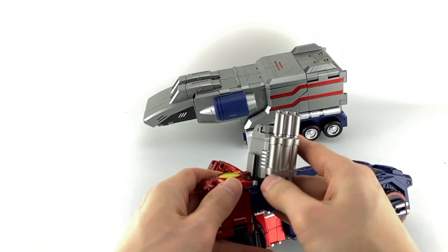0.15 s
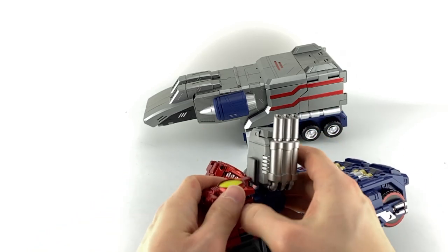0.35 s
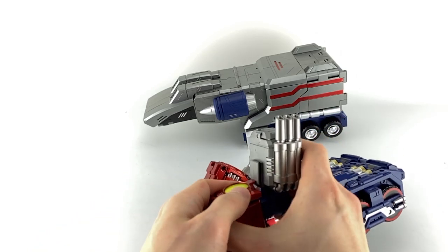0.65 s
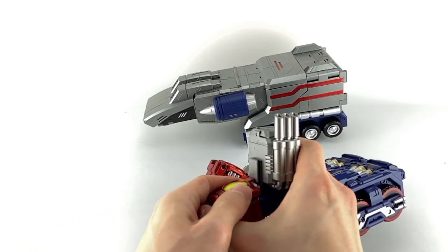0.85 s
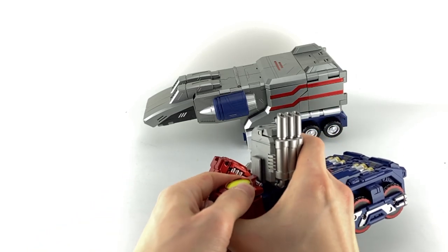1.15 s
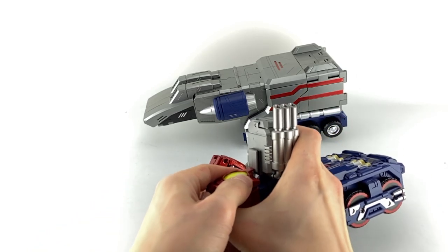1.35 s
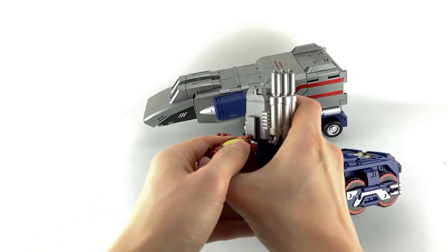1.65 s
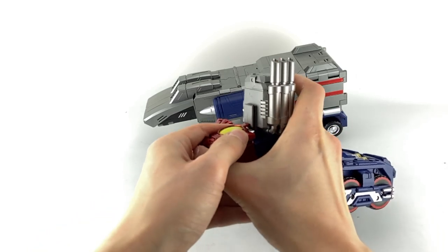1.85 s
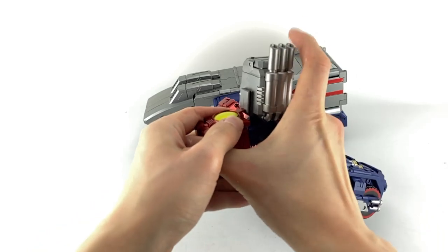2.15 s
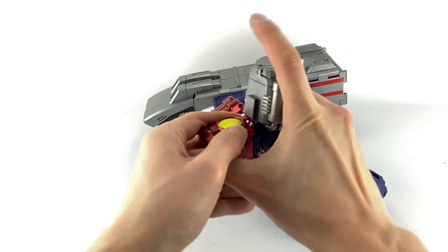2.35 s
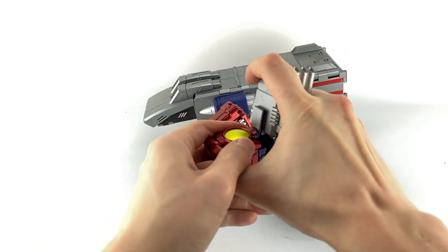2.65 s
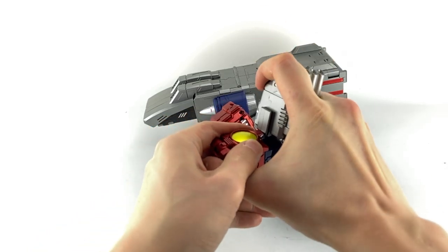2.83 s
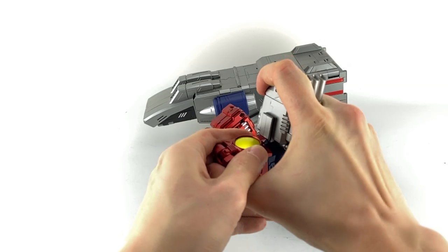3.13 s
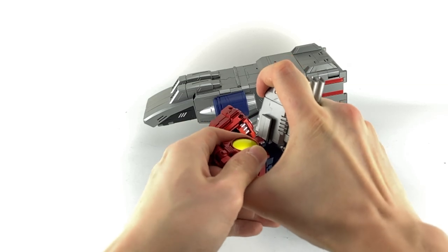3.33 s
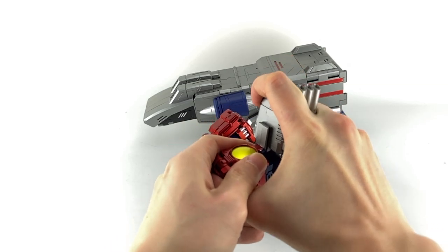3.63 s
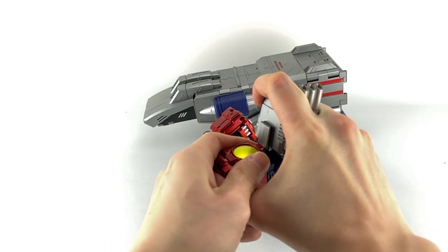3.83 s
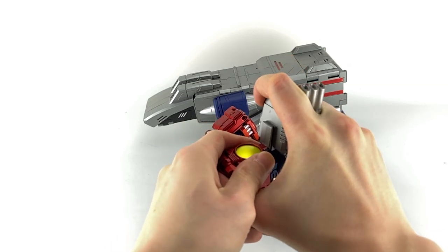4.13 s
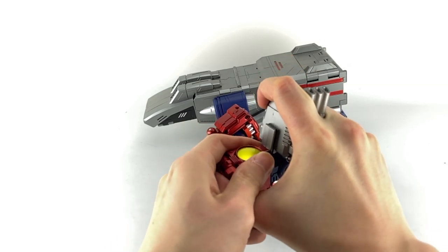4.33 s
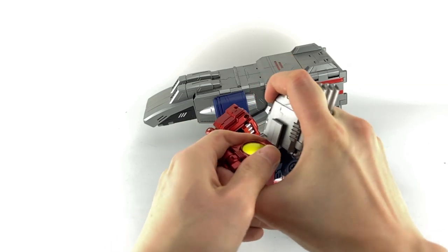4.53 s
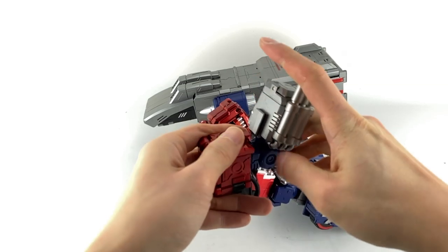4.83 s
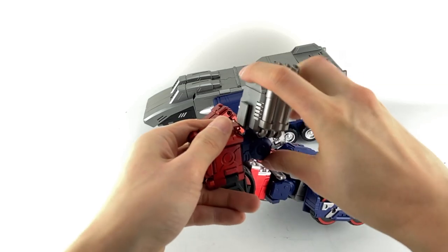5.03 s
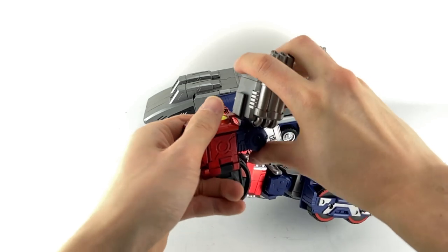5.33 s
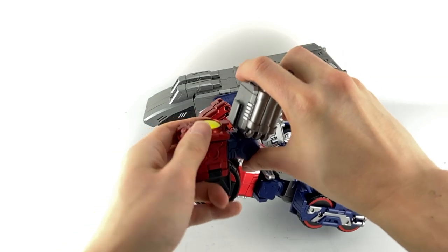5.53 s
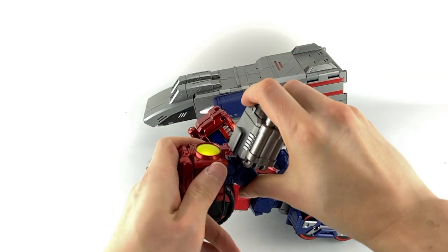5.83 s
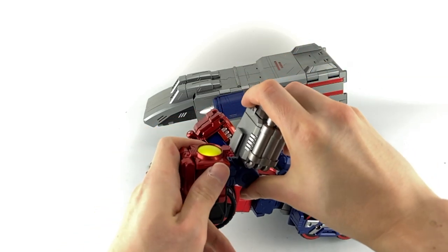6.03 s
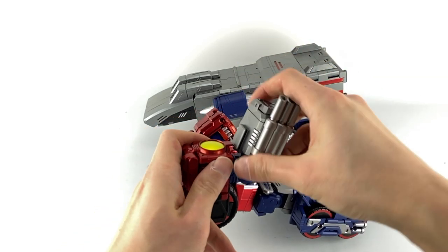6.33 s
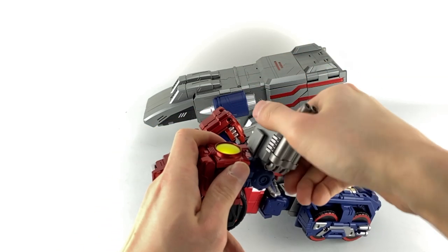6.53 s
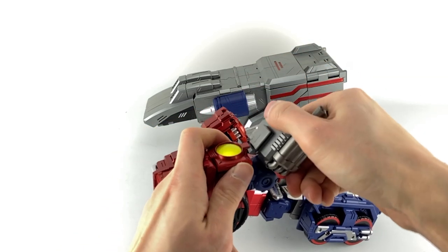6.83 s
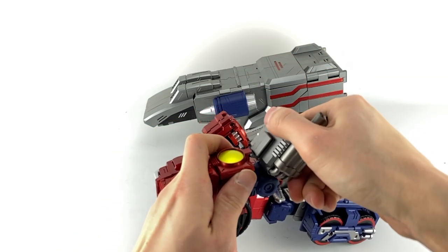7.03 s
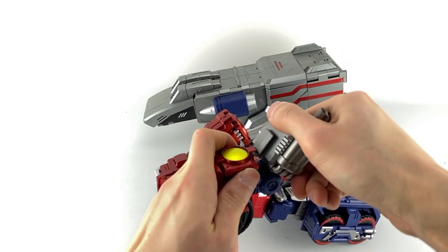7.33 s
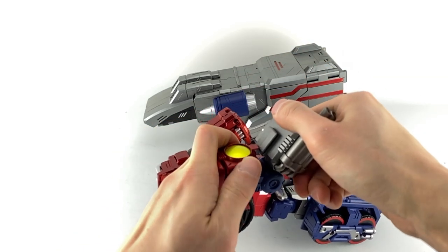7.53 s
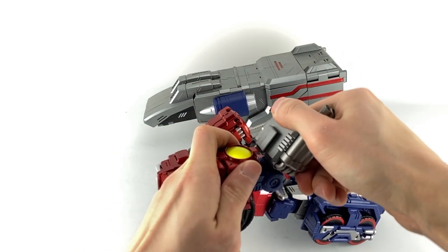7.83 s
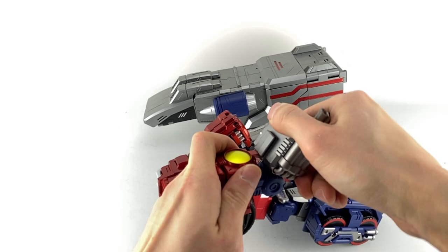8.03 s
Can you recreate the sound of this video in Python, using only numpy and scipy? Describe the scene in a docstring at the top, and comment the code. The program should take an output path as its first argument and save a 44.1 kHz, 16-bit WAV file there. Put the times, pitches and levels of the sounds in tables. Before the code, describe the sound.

A close microphone in a small, still room picks up a hollow plastic toy being handled on a table, over a steady, soft, bass-heavy hush. From 0 to 0.7 s the figure scrapes and rattles with short pitched ticks, dull low bumps and a tight pair of bright snaps around 0.35 s. Slower chattering drags and soft thumps continue, bending slightly in pitch, until a very loud, crisp tab snap at 1.9 s. From 2 to 4.6 s it is much quieter: brief dry finger rubs and small clicks, one clearer at 2.4 s. Scuffing grows from 4.7 s, with a firm clack and table thump at 5.15 s, then lighter rubs and ticks. At 6.5 s parts knock down heavily; a piercing snap at 6.7 s and another booming knock at 6.8 s follow. Rubbing fades, leaving near stillness, then soft scuffs from 7.8 s and a light knock at 8.1 s.

```python
"""Hands fold a plastic toy figure on a tabletop in a small, quiet room, close to a microphone.
First the figure drags (modal friction) and rattles (pitched taps) over the table as stiff tabs snap home
(noise cracks with ringing modes). Then fingers rub (coloured friction) and tick on the hollow shells.
Late on, the legs knock down around a last snap (noise through table modes) and the table booms (a swinging
low mode); a few scuffs and a light knock end it, over a steady hush of shaped noise."""
import sys
import numpy as np
from scipy import signal
from scipy.fft import rfft, irfft
from scipy.io import wavfile
from scipy.ndimage import uniform_filter1d

SR = 44100
rng = np.random.default_rng(int(sys.argv[2]) if len(sys.argv) > 2 else 0)


def wrap_up_sound(samples):
    """Save the sound to the file named by the first command line argument, as 16-bit audio."""
    columns = np.atleast_2d(samples).T
    # keep every value between -1 and 1, then stretch to whole-number steps
    tamed = np.clip(columns, -1, 1)
    steps = np.round(tamed * 32767).astype(np.int16)
    wavfile.write(sys.argv[1], SR, steps)


N = 360561
TIME = np.arange(N) / SR

# ringing modes of the plastic shells: pitch_hz, relative_db, t60_s
SHELL_MODES = [(1000, -11, .06), (1330, -9, .06), (1686, -7, .05), (2370, -8, .035), (2997, -4, .045),
               (3220, -7, .04), (3400, -12, .09), (4700, -3, .03), (5095, -5, .03), (5865, 0, .04),
               (6110, -5, .03), (6322, -4, .035), (6812, -2, .03), (7060, -3, .03), (7923, -1, .035),
               (8910, -5, .025), (9275, -5, .025), (10785, -6, .025), (11300, -5, .025), (13560, -7, .02)]
# resonances of the tabletop under the figure: pitch_hz, width_hz, relative_db
TABLE_MODES = [(224, 18, 2), (270, 22, -2), (301, 16, 1), (346, 24, -3), (395, 28, -2), (468, 16, -1),
               (680, 220, -9), (880, 40, 0), (945, 30, -6), (1003, 40, -4), (1140, 30, -9), (1295, 70, -6),
               (1384, 45, -5), (1760, 80, -8), (2340, 140, -5), (3000, 60, -9)]
# shoves and landings that rock the table: start_s, rise_s, then levels before the gains in table_boom:
# lowest_mode_db, higher_modes_db
THUMPS = [(0.03, 0.02, -43, -56), (0.165, .022, -34.5, -46), (0.374, .03, -31.5, -52),
          (0.51, 0.035, -30.5, -45), (0.878, 0.048, -26.5, -45), (0.775, 0.03, -46.5, -55),
          (1.588, 0.032, -34, -57), (1.655, 0.026, -40, -60), (1.70, 0.027, -37, -43.5),
          (1.785, .03, -40, -54), (1.916, 0.023, -41.5, -46), (1.994, .03, -38.5, -43),
          (2.075, 0.024, -45.5, -49), (2.81, 0.037, -49, -58), (3.179, 0.035, -43, -44.5),
          (3.625, 0.031, -59, -49.5), (4.06, 0.051, -46, -65.5), (4.368, 0.027, -43, -54),
          (4.635, 0.026, -48, -63), (5.085, 0.055, -45, -43), (5.143, 0.034, -26, -33),
          (5.304, 0.015, -39, -37), (5.36, 0.027, -37.5, -47), (5.745, 0.018, -53, -50.5),
          (6.154, 0.018, -50, -60), (6.512, 0.023, -25.5, -27.5), (6.66, .015, -31.5, -32),
          (6.705, .013, -33.5, -32.5), (6.795, .016, -23.5, -27), (6.84, .014, -40, -31),
          (7.014, .018, -35, -43), (7.06, .02, -41.5, -52), (7.994, .02, -53, -57),
          (8.091, 0.032, -44.5, -56)]
# slides of the figure over the table: start_s, end_s, body_db (below 4 kHz), edge_db (above 4 kHz),
# change_db (start to end), then levels before the gains in table_boom: lowest_mode_db, higher_modes_db
SLIDES = [(0.0, 0.093, -46, -49, -5, -64, -53), (0.114, 0.259, -49.5, -59, 3.5, -58, -47),
          (0.422, 0.62, -51.5, -57.5, 3, -49, -45), (0.66, 0.748, -63, -65.5, -1, -47.5, -49.5),
          (0.851, 1.016, -54, -64, -1.5, -52, -53), (1.054, 1.324, -70, -67.5, -2.5, -56.5, -57.5),
          (1.368, 1.534, -56.5, -64.5, 1, -48, -49), (1.578, 1.91, -54, -63, 6, -45, -59),
          (1.947, 2.053, -53, -59, -4, -48, -45.5)]


def amp(db):
    """Decibels to gain."""
    return 10 ** (np.asarray(db) / 20)


def unit(x):
    """Scales to an rms of 1."""
    return x / np.sqrt(np.mean(x ** 2) + 1e-20)


def crest(x, size=176):
    """Scales so that the loudest few milliseconds (size in samples) have an rms of 1."""
    return x / np.sqrt(uniform_filter1d(x ** 2, size).max() + 1e-20)


def read(points, hz):
    """Reads a table of (Hz, value) on a log-frequency axis."""
    f, value = np.transpose(points)
    return np.interp(np.log(hz + 1), np.log(f + 1), value)


def add(mix, start_s, sound):
    """Mixes a sound in at start_s."""
    part = mix[max(round(start_s * SR), 0):][:len(sound)]
    part += sound[:len(part)]


def band(x, lo_hz, hi_hz, order=3):
    """Band-pass."""
    return signal.sosfilt(signal.butter(order, [lo_hz, hi_hz], "band", fs=SR, output="sos"), x)


def colour(x, points):
    """Weights a spectrum by a table of (Hz, dB)."""
    gain = amp(read(points, np.fft.rfftfreq(len(x), 1 / SR)))
    return irfft(rfft(x) * gain, len(x))


def resonate(x, modes):
    """Passes x through a body's parallel resonances."""
    out = 0
    for hz, width_hz, db in modes:
        b, a = signal.iirpeak(hz, hz / width_hz, SR)
        out = out + amp(db) * signal.lfilter(b, a, x)
    return out


def drift(size):
    """Smooth noise of rms 1 that changes over about size samples."""
    return unit(uniform_filter1d(uniform_filter1d(rng.standard_normal(N), size), size))


def friction(grains_per_s, spread_db, grain_share, uneven_db):
    """Countless tiny slips, with larger ones standing out, under an uneven pressure."""
    grain_size = amp(spread_db * np.minimum(rng.exponential(1, N), 4))
    grains = (rng.random(N) < grains_per_s / SR) * grain_size * rng.choice([-1, 1], N)
    slips = rng.standard_normal(N) + grain_share * unit(grains)
    return slips * amp(uneven_db * drift(size=400))


def room_hush():
    """The still room: steady noise with most of its power in the bass."""
    # pitch_hz, relative_db (per Hz)
    hush_spectrum = [(15, -42.5), (25, -15), (66, 0.5), (123, -1.5), (180, -7), (229, -6.5), (607, -14.5),
                     (1020, -17.5), (1330, -19.5), (2610, -24), (2990, -25), (4370, -26.5), (12500, -31),
                     (14400, -29.5), (16000, -42)]
    return amp(-58) * unit(colour(rng.standard_normal(N), hush_spectrum))


def room(x, wet_db, bounce_db, bounce_s):
    """The bounce off the tabletop, and a short tail that dies first in the treble."""
    # the room's decay: pitch_hz, t60_s
    room_decay = [(150, .5), (500, 0.4), (2000, 0.33), (5000, .34), (9000, 0.2), (15000, .22)]
    hz, t, z = signal.stft(rng.standard_normal(SR * 3 // 4), SR, nperseg=256)
    decay = amp(-60 * t / read(room_decay, hz)[:, None])
    tail = signal.istft(z * decay, SR, nperseg=256)[1]
    tail = tail * np.clip(np.arange(len(tail)) / SR / 0.0009 - 1, 0, 1)
    echo = amp(wet_db) * tail / np.linalg.norm(tail)
    # hands and toy scatter the bounce and shade its bass
    scatter = rng.standard_normal(200) * np.exp(-np.arange(200) / 20)
    scatter = band(scatter, 1500, 16000, order=1)
    add(echo, bounce_s, amp(bounce_db) * scatter / np.linalg.norm(scatter))
    return x + signal.fftconvolve(x, echo)[:N]


def slid(column_db):
    """Gain over time of the slides: each starts quickly, grows or fades evenly in dB and dies away."""
    attack_s, t60_s = 0.018, 0.2
    out = np.zeros(N)
    for (start_s, end_s, _, _, change_db, _, _), db in zip(SLIDES, column_db):
        t = np.clip(TIME - start_s, 0, None)
        progress = np.minimum(t / (end_s - start_s), 1)
        release_db = -60 * np.clip(TIME - end_s, 0, None) / t60_s
        out += np.minimum(t / attack_s, 1) * amp(db + change_db * (progress - .5) + release_db)
    return out


def thumped(column_db):
    """Gain over time of the thumps, given their levels: each builds up, then dies in two stages."""
    # the swing dies fast, the table's frame rings on
    swing_t60_s, frame_db, frame_t60_s = .13, -16, .5
    power, t = np.zeros(N), np.arange(SR // 2) / SR
    for (start_s, rise_s, _, _), db in zip(THUMPS, column_db):
        after = np.maximum(t - rise_s, 0)
        rise = np.sin(np.pi / 2 * np.minimum(t / rise_s, 1)) ** 2
        fall = amp(-60 * after / swing_t60_s) + amp(frame_db - 60 * after / frame_t60_s)
        add(power, start_s, (amp(db) * rise * fall) ** 2)
    return np.sqrt(power)


def table_boom():
    """Thumps, slides and resting hands set the table's lowest mode swinging, with a dull rumble around it."""
    _, _, thump_low_db, thump_high_db = np.transpose(THUMPS)
    *_, slide_low_db, slide_high_db = np.transpose(SLIDES)
    # hands resting on the table keep it faintly astir
    rest = amp(-63 + 4.5 * drift(size=1500))
    uneven_slide = slid(slide_low_db) * amp(3.0 * drift(size=900))
    swing = np.hypot(thumped(thump_low_db), uneven_slide + rest)
    shake = np.hypot(thumped(thump_high_db), slid(slide_high_db) + rest)
    mode_hz = 132 + 5 * drift(size=1100)
    mode = np.sqrt(2) * np.sin(2 * np.pi * np.cumsum(mode_hz) / SR)
    rumble = unit(band(rng.standard_normal(N), 71, 150, order=4))
    upper = unit(band(resonate(rng.standard_normal(N), TABLE_MODES), 205, 320, order=1))
    return swing * (amp(-1.5) * mode + amp(-11.5) * rumble) + amp(-5.5) * shake * upper


def knocks():
    """Several parts of the figure land almost together and shake the tabletop."""
    # start_s, low_db (250-520 Hz), mid_db (520-1450 Hz), high_db (1.5-3.2 kHz), t60_s
    knock_events = [(0.031, -48, -37.5, -48, 0.17), (0.173, -37, -34, -54, 0.077),
                    (0.186, -32, -31, -36, 0.076), (0.371, -44, -36.5, -50, 0.26),
                    (0.556, -38.5, -39.5, -39.5, 0.13), (0.882, -46, -43, -60, 0.31),
                    (5.152, -41, -40, -37, 0.17), (5.312, -51, -57, -65.5, 0.086),
                    (5.341, -55, -45.5, -50, 0.29), (5.613, -62, -46.5, -63, 0.064),
                    (5.761, -62, -48, -56, 0.08), (6.5161, -23.5, -24.5, -34.5, 0.086),
                    (6.663, -33.5, -34.5, -39, 0.089), (6.711, -43, -29.5, -34.5, 0.089),
                    (6.736, -58, -32, -37, 0.088), (6.7981, -25.5, -21.5, -32.5, 0.11),
                    (7.014, -40.5, -57.5, -64.5, 0.08), (8.086, -63, -46, -49, 0.02)]
    out, t = np.zeros(N), np.arange(SR // 2) / SR
    for start_s, low_db, mid_db, high_db, t60_s in knock_events:
        blow = rng.standard_normal(len(t)) * amp(-60 * t / t60_s) * (1 - np.exp(-t / 0.0013))
        body = resonate(blow, TABLE_MODES) + .3 * blow
        low, mid, high = band(body, 250, 520), band(body, 520, 1450), band(body, 1500, 3200)
        add(out, start_s, amp(low_db) * crest(low) + amp(mid_db) * crest(mid) + amp(high_db) * crest(high))
    return out


def drag():
    """The legs chatter as they slide over the table; their notes bend down and up along a time curve."""
    # resonances of the dragging legs: pitch_hz, width_hz, relative_db
    leg_modes = [(560, 250, -8), (900, 150, -6), (1400, 200, -6), (2180, 150, -6), (2370, 170, 0),
                 (2610, 140, -1), (2960, 90, -7), (3400, 120, -13), (5500, 200, -15), (6330, 200, -13),
                 (7000, 200, -14), (8000, 200, -14), (10050, 300, -8), (12500, 2000, -21)]
    # pitch bend of the legs: time_s, pitch_factor (on the body band only)
    leg_bend = [(0, 0.96), (1.25, 0.99), (1.42, 0.98), (1.6, 0.94), (1.72, 1.1), (1.82, 0.98), (1.9, 1.04)]
    _, _, body_db, edge_db, *_ = np.transpose(SLIDES)
    slips = friction(grains_per_s=400, spread_db=3, grain_share=.5, uneven_db=1.3)
    legs = resonate(slips, leg_modes) + .04 * slips
    # a varying read speed bends the pitch
    speed = np.interp(TIME, *np.transpose(leg_bend))
    bent = np.interp(np.cumsum(speed) / SR, TIME, legs)
    body, edge = unit(band(bent, 400, 3300)), unit(band(legs, 4200, 16500))
    return slid(body_db) * body + slid(edge_db) * edge


def scuffs(patch_db, taper_share):
    """Each regrip is a short slide that swells and stops; every patch of shell has its own resonances."""
    # fingers and parts on the shells: start_s, end_s, low_db (0.6-3.5 kHz), mid_db (4.3-8.5 kHz),
    # high_db (9-16.5 kHz)
    scuff_events = [(1.059, 1.112, -52, -61, -58), (2.25, 2.31, -66.5, -64.5, -61.5),
                    (2.518, 2.631, -63, -66.5, -64.5), (2.69, 2.76, -65.5, -71.5, -63.5),
                    (2.895, 2.966, -62, -61.5, -71.5), (3.012, 3.135, -54.5, -60.5, -63.5),
                    (3.13, 3.234, -71, -72, -66), (3.292, 3.365, -53.5, -59, -64),
                    (3.406, 3.467, -65.5, -72, -70), (3.553, 3.68, -58, -61.5, -70.5),
                    (4.003, 4.083, -60.5, -63, -68), (4.085, 4.138, -61, -65.5, -75),
                    (4.285, 4.392, -55, -57.5, -60.5), (4.465, 4.579, -56.5, -56.5, -63),
                    (4.559, 4.726, -61, -63, -61), (4.703, 4.841, -50.5, -46, -52.5),
                    (4.84, 4.911, -58.5, -54.5, -54.5), (4.879, 5.029, -54.5, -60, -66),
                    (5.028, 5.146, -48.5, -51, -56.5), (5.206, 5.289, -49.5, -51.5, -47.5),
                    (5.307, 5.387, -48, -50.5, -52.5), (5.362, 5.45, -54, -56, -64),
                    (5.433, 5.523, -64, -62, -66), (5.581, 5.664, -61.5, -56, -56),
                    (5.692, 5.832, -61, -68.5, -69), (6.19, 6.313, -69, -64.5, -64.5),
                    (6.28, 6.462, -55, -56, -55), (6.437, 6.542, -59.5, -61, -60),
                    (6.538, 6.612, -76, -58, -52), (6.814, 6.899, -51, -52, -57),
                    (6.886, 7.061, -55.5, -56, -62), (7.377, 7.493, -69, -74.5, -72),
                    (7.556, 7.609, -60, -64, -69), (7.834, 7.938, -54.5, -56.5, -59.5),
                    (7.913, 8.008, -54.5, -54, -58), (8.04, 8.15, -63, -67.5, -83)]
    # colour of the slips: pitch_hz, relative_db (per Hz)
    scuff_spectrum = [(300, -26.5), (700, -4), (1300, 1), (2400, 2.5), (3000, 2.5), (3800, -8.5),
                      (6200, -7), (9000, -16.5), (13000, -7.5), (16000, -13.5)]
    slips = friction(grains_per_s=530, spread_db=3.5, grain_share=0.52, uneven_db=1.5)
    slips = colour(slips, scuff_spectrum)
    shell_widths = [(hz, 5 / t60_s, db) for hz, db, t60_s in SHELL_MODES]
    slips = slips + 0.26 * resonate(slips, shell_widths)
    out, patch_hz = np.zeros(N), np.geomspace(600, 16000, 80)
    for start_s, end_s, low_db, mid_db, high_db in scuff_events:
        patch = np.c_[patch_hz, patch_db * rng.standard_normal(len(patch_hz))]
        size = max(round((end_s - start_s) * SR), 256)
        slide = colour(slips[round(start_s * SR):][:size], patch)
        low, mid, high = band(slide, 600, 3500), band(slide, 4300, 8500), band(slide, 9000, 16500)
        stroke = signal.windows.tukey(len(slide), taper_share)
        rub = amp(low_db) * unit(low) + amp(mid_db) * unit(mid) + amp(high_db) * unit(high)
        add(out, start_s, stroke * rub)
    return out


def hollow():
    """The air and walls of a hollow part give each contact a dull, short knock."""
    t = np.arange(SR // 6) / SR
    return crest(band(rng.standard_normal(len(t)) * amp(-60 * t / .06), 517, 1210, order=2))


def taps():
    """A loose hollow part gives a short, pitched tick in its joint and chatters as it settles."""
    # start_s, peak_db (of the tick), pitch_hz, t60_s
    tap_events = [(0.0295, -19.5, 1584, 0.17), (0.1273, -25, 1727, 0.19), (0.187, -16.5, 1405, 0.14),
                  (0.2116, -27, 2520, 0.054), (0.2252, -19.5, 1747, 0.082), (0.3544, -27, 1690, 0.09),
                  (0.372, -23, 1393, 0.15), (0.413, -21.5, 1690, 0.06), (0.494, -26, 1700, 0.03),
                  (0.5508, -20.5, 1630, 0.053), (0.634, -31, 1675, 0.037), (0.676, -28.5, 1723, 0.14),
                  (0.8643, -35.5, 1730, 0.073), (0.9325, -27.5, 1687, 0.062), (1.0909, -29.5, 2244, 0.034),
                  (3.278, -40, 1345, 0.093), (3.6274, -39.5, 1372, 0.046), (4.0315, -32.5, 1950, 0.031),
                  (5.499, -41.5, 1333, 0.084), (5.7606, -34, 1345, 0.096), (5.9571, -41, 1316, 0.076),
                  (6.203, -41.5, 1750, 0.049)]
    out, t = np.zeros(N), np.arange(SR // 6) / SR
    for start_s, db, hz, t60_s in tap_events:
        chatter = .3 * unit(band(rng.standard_normal(len(t)), hz * .7, hz * 1.3, order=2))
        decay = amp(-60 * t / .025) + .4 * amp(-60 * t / t60_s)
        tick = (np.sin(2 * np.pi * hz * t) + chatter) * decay * (1 - np.exp(-t / 0.00038))
        add(out, start_s, amp(db) * (tick / abs(tick).max() + amp(-21) * hollow()))
    return out


def shell_hit(low_db, mid_db, high_db, t60_s, rise_s, tick_db, ring_db, buzz_db, buzz_t60_s, mid_top_hz):
    """The tick of contact and a crack of dense, short modes; strong modes and loose neighbours ring on."""
    t = np.arange(SR // 5) / SR
    decay = amp(tick_db - 60 * t / 0.0029) + amp(-60 * t / t60_s) + amp(buzz_db - 60 * t / buzz_t60_s)
    crack = rng.standard_normal(len(t)) * decay
    # the grip and the place of contact shift each mode's pitch and strength
    hz, db, mode_t60_s = np.transpose(SHELL_MODES)[:, :, None]
    hz = hz * rng.normal(1, .007, hz.shape)
    db = db + rng.normal(0, 3, db.shape)
    cycles = hz * t + rng.random(hz.shape)
    ring = (amp(db - 60 * t / mode_t60_s) * np.sin(2 * np.pi * cycles)).sum(0)
    hit = (crack + amp(ring_db) * ring) * (1 - np.exp(-(t / rise_s) ** 2))
    low, mid = band(hit, 1100, 2200, order=4), band(hit, 2400, mid_top_hz, order=4)
    high = band(hit, 4400, 17000)
    return amp(low_db) * crest(low) + amp(mid_db) * crest(mid), amp(high_db) * crest(high)


def clicks():
    """Lighter contacts between shells and joints, softer in the top treble."""
    # start_s, low_db (1.1-2.2 kHz), mid_db (2.4-4.26 kHz), high_db (above 4.4 kHz, before softening), t60_s
    click_events = [(0.0306, -31, -51, -31, 0.031), (0.182, -32, -33, -37.5, 0.012),
                    (0.1865, -31, -38.5, -34, 0.038), (0.212, -41, -39, -47, 0.034),
                    (0.5001, -34, -41.5, -45, 0.11), (0.879, -34, -50.5, -49.5, 0.036),
                    (0.884, -39.5, -46.5, -53, 0.055), (1.094, -42, -47, -60, 0.051),
                    (1.1503, -49, -56, -37.5, 0.036), (1.384, -46.5, -78, -73, 0.079),
                    (1.549, -39.5, -60, -61, 0.04), (1.556, -40.5, -50.5, -60, 0.043),
                    (2.256, -56, -51.5, -55.5, 0.081), (2.3316, -53, -68.5, -57, 0.031),
                    (2.408, -40, -38, -34.5, 0.05), (3.156, -52, -57, -59, 0.055),
                    (3.169, -44, -47, -41.5, 0.031), (3.1847, -63.0, -63, -42, 0.036),
                    (3.278, -46, -54.5, -45, 0.038), (3.6277, -43.5, -53.5, -65, 0.044),
                    (4.031, -65, -42, -54, 0.014), (4.091, -61, -59, -68, 0.04),
                    (4.364, -47.5, -48, -61, 0.03), (4.6, -64, -58, -54, 0.055),
                    (4.6332, -47, -44.5, -60.5, 0.03), (4.653, -49, -49, -62, 0.027),
                    (4.6923, -53, -41, -34, 0.0073), (4.777, -48, -48, -42, 0.045),
                    (4.816, -54, -49, -45, 0.069), (5.062, -42.5, -41, -55, 0.041),
                    (5.147, -28.5, -25.5, -33.5, 0.035), (5.1541, -36.5, -46, -59, 0.058),
                    (5.397, -40, -50, -60, 0.11), (5.477, -56, -54.5, -62, 0.04),
                    (5.541, -54, -58, -64, 0.061), (5.611, -45.5, -53, -62, 0.012),
                    (5.6299, -38, -45, -40, 0.016), (5.72, -54, -50, -69.5, 0.021),
                    (5.76, -53, -57.5, -71, 0.11), (6.2033, -54, -57, -74, 0.13),
                    (6.431, -44.5, -54, -42.5, 0.06), (6.5213, -35.5, -45, -45, 0.045),
                    (6.796, -29.5, -32, -27, 0.052), (6.915, -50, -54, -61, 0.054),
                    (7.543, -63.5, -65, -57.5, 0.045), (8.0844, -38, -37, -43, 0.025)]
    out = np.zeros(N)
    for start_s, low_db, mid_db, high_db, t60_s in click_events:
        body, edge = shell_hit(low_db, mid_db, high_db, t60_s, rise_s=0.00054, tick_db=5.5, ring_db=-12,
                               buzz_db=-21, buzz_t60_s=0.18, mid_top_hz=4260)
        add(out, start_s, amp(low_db - 10.5) * hollow())
        add(out, start_s, body + band(edge, 1900, 12500, order=1))
    return out


def snaps():
    """A stiff tab lets go all at once and snaps home: the brightest and loudest sounds."""
    # start_s, low_db (1.1-2.2 kHz), mid_db (2.4-3.45 kHz), high_db (above 4.4 kHz), t60_s (of the crack)
    snap_events = [(0.3332, -34, -34, -13.5, 0.02), (0.3621, -29.5, -29, -10.5, 0.014),
                   (1.9139, -38.5, -22.5, -6, 0.017), (6.6948, -20.5, -17, -6, 0.016)]
    out = np.zeros(N)
    for start_s, low_db, mid_db, high_db, t60_s in snap_events:
        body, edge = shell_hit(low_db, mid_db, high_db, t60_s, rise_s=.0009, tick_db=2, ring_db=-15,
                               buzz_db=-21, buzz_t60_s=.1, mid_top_hz=3450)
        add(out, start_s, body + edge)
    return out


def scene():
    """Toy and table in the room, over its hush."""
    rubbing = scuffs(patch_db=3.0, taper_share=0.78)
    toy = knocks() + drag() + rubbing + taps() + clicks() + snaps()
    toy_in_room = room(toy, wet_db=-14, bounce_db=-12.5, bounce_s=0.0033)
    return (room_hush() + table_boom() + toy_in_room)[None]


def record(dry):
    """The microphone's colour, a full-scale ceiling, then the band limit."""
    # the microphone's response: pitch_hz, gain_db
    mic_response = [(25, -14), (48, -1), (9000, 0), (13000, -3.5), (16000, -6)]
    heard = np.clip(colour(dry[0], mic_response), -1, 1)
    low_pass = signal.firwin(301, 15950, window=("kaiser", 8), fs=SR)
    return signal.oaconvolve(heard, low_pass, "same")[None]


dry = scene()
out = record(dry)
wrap_up_sound(out)
```